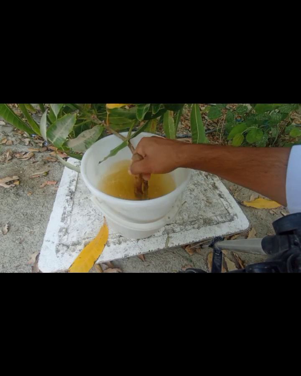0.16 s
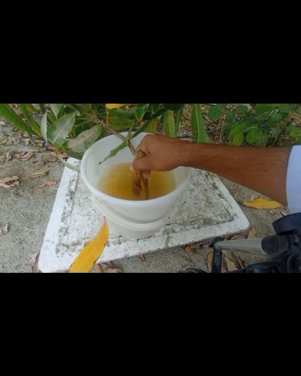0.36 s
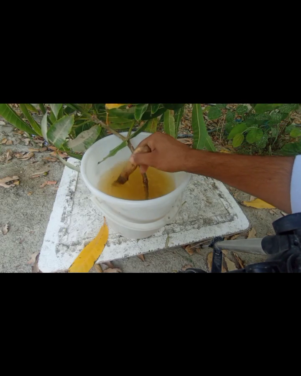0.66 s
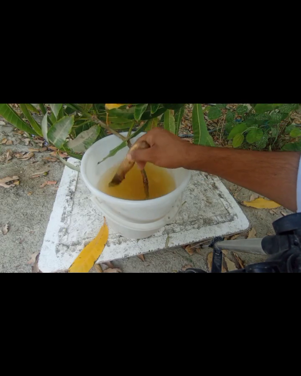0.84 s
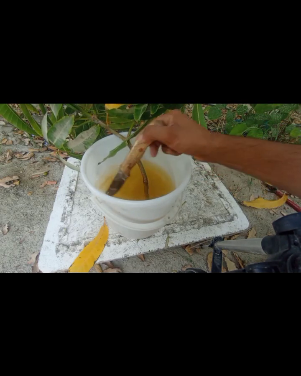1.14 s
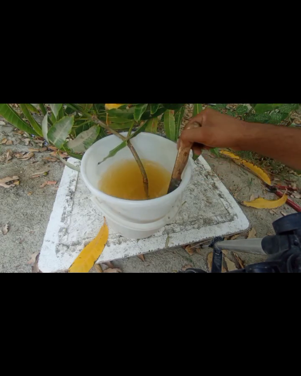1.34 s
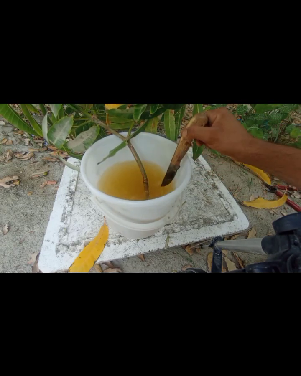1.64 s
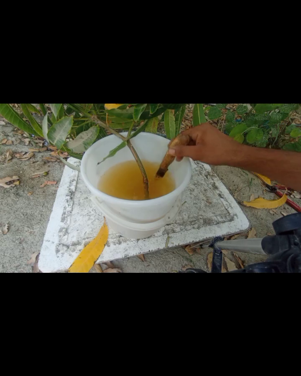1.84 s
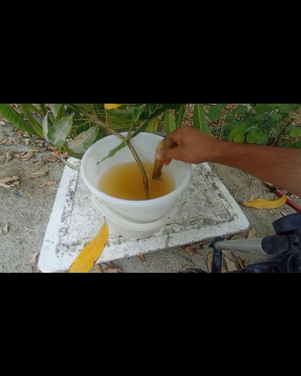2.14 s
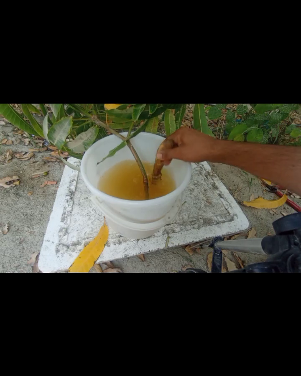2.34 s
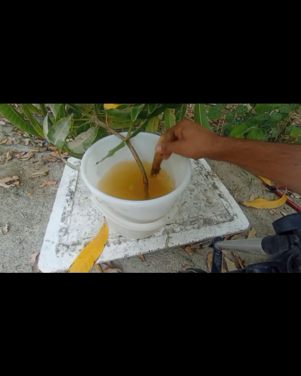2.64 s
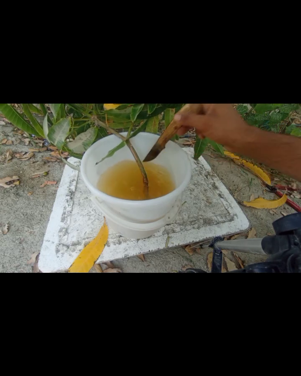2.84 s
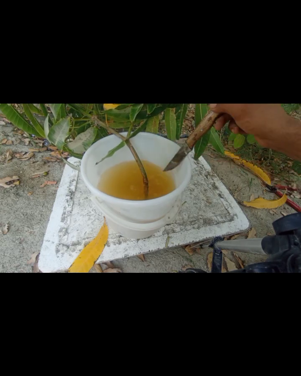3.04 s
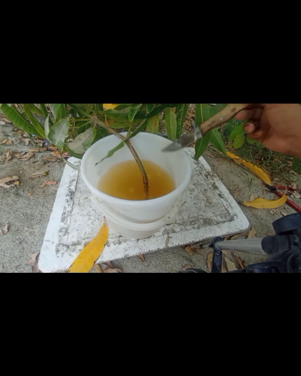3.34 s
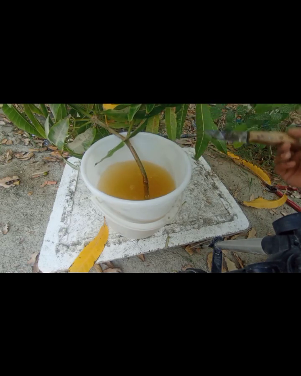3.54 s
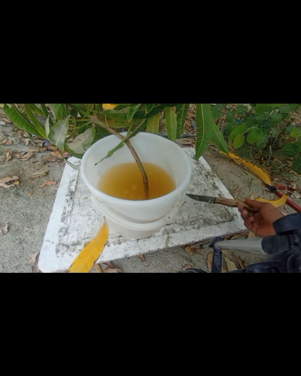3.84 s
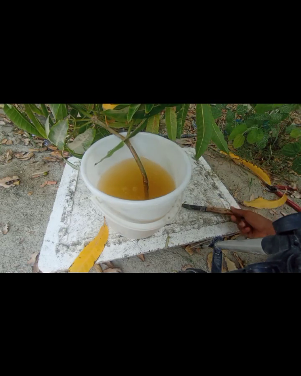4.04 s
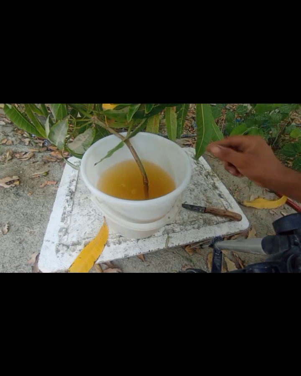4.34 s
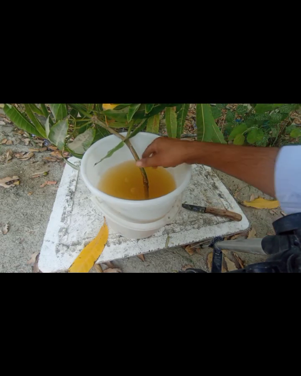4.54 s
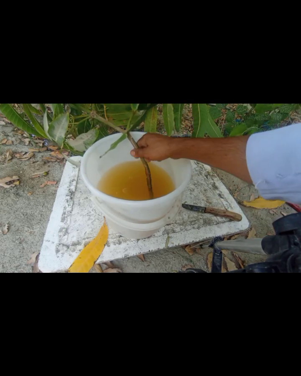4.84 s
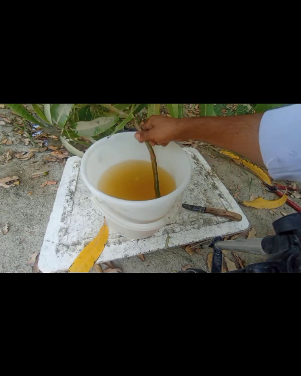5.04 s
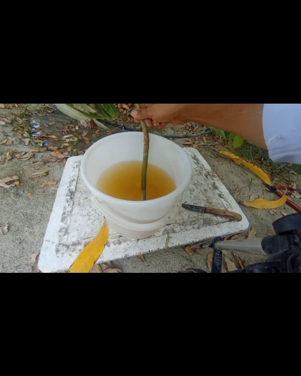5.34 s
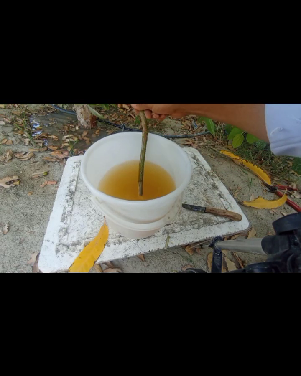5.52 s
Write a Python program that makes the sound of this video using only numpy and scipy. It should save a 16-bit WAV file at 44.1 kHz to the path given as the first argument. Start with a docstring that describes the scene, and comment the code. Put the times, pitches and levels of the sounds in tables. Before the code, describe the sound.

Outdoors, close to the microphone, a knife stirs water in a plastic bucket, knocking the wall with hollow clacks amid small splashes and bubbles. Two bright taps hit the rim, then the knife is laid on a board with dull thumps and a short gritty hiss. A leafy branch rustles faintly as it is lifted and drips, over distant rumble and soft hiss.

```python
"""Knife and bucket outdoors

A knife close by stirs water in a plastic bucket: struck modes and noise make it knock the wall, noise bursts
and rising tones make splashes and bubbles; it taps the rim twice, then is laid on the board under the bucket
with a short slide of hissing grit. A leafy branch rustles in random crackles as it is lifted, its wet stem
dripping. Filtered noise makes a distant rumble and a soft hiss; a wavering sine makes the low hum."""
import sys
import numpy as np
from scipy import signal
from scipy.fft import rfft, irfft
from scipy.io import wavfile
from scipy.ndimage import uniform_filter1d

SR = 44100
rng = np.random.default_rng(int(sys.argv[2]) if len(sys.argv) > 2 else 0)


def store_wav(level_fs):
    """Save 16-bit WAV to argv[1]."""
    pcm = np.round(np.clip(np.atleast_2d(level_fs), -1, 1) * 32767)
    wavfile.write(sys.argv[1], SR, pcm.T.astype(np.int16))


N = 250488
TIME = np.arange(N) / SR  # seconds into the scene
AGE = np.arange(11000) / SR  # seconds since a hit began


def undb(db):
    """Decibels to gain."""
    return 10 ** (np.asarray(db) / 20)


def level(x, db):
    """Scale to this rms level."""
    return x * undb(db) / np.sqrt(np.mean(x ** 2))


def loudest(x, db, span):
    """Scale a hit so that its loudest span seconds have this rms level."""
    power = np.mean(x ** 2, axis=0)
    window = max(int(span * SR), 2)
    return x * undb(db) / np.sqrt(uniform_filter1d(power, window, mode="constant").max())


def pan(db):
    """Left and right gains, db apart; positive leans left."""
    return undb(np.array([[db], [-db]]) / 2)


def fade(t60):
    """Decay by 60 dB in t60 seconds, 2 ms at the shortest."""
    return np.exp(-np.log(1000) * AGE / max(t60, .002))


def swell(rise):
    """Soft onset with this time constant in seconds."""
    return 1 - np.exp(-AGE / max(rise, 1e-5))


def curve(rows):
    """Gain along (s, dB) rows, silent outside them."""
    return undb(np.interp(TIME, *np.transpose(rows), left=-np.inf, right=-np.inf))


def over_hz(rows, n):
    """(Hz, value) rows spread over the bins of an n-sample spectrum."""
    hz, value = np.transpose(rows)
    return np.interp(np.log(np.fft.rfftfreq(n, 1 / SR) + 1), np.log(hz), value)


def colour(x, rows):
    """Filter by (Hz, dB) rows."""
    n = x.shape[-1]
    return irfft(rfft(x) * undb(over_hz(rows, n)), n)


def band(x, lo_hz, hi_hz, order=3):
    """Causal band-pass."""
    sos = signal.butter(order, [lo_hz, min(hi_hz, .48 * SR)], "band", fs=SR, output="sos")
    return signal.sosfilt(sos, x)


# How alike the two channels are. Each row: frequency in Hz, left-right correlation.
LIKENESS = [(60, 0.46), (130, 0.95), (300, 0.66), (700, 0.19), (1400, 0), (16000, 0)]


def noise(n):
    """White stereo noise whose bass is alike left and right."""
    mid, side = rfft(rng.standard_normal((2, n)))
    alike = np.clip(over_hz(LIKENESS, n), -1, 1)
    shared = mid * np.sqrt((1 + alike) / 2)
    opposed = side * np.sqrt((1 - alike) / 2) * np.array([[1], [-1]])
    return irfft(shared + opposed, n)


def walk(rate):
    """Slow chance with a spread near 1, drawn anew rate times a second."""
    k = int(SR / rate)
    steps = np.repeat(rng.standard_normal(N // k + 1), k)
    return 1.3 * uniform_filter1d(uniform_filter1d(steps, k), k)[:N]


def ring(hz, t60, rise=0):
    """A fading resonance; the higher it is, the more its phase differs between the ears."""
    apart = min(hz / 1600, 2) * rng.normal(1.0, 1.0) * np.array([[1], [-1]]) / 2
    cycles = hz * (AGE + rise * AGE ** 2 / 2)
    return np.sin(2 * np.pi * cycles + apart) * fade(t60)


def struck(modes, scatter_db):
    """Every blow lands elsewhere and weights the modes anew, with slightly shifted pitches."""
    out = 0
    for hz, db, t60 in modes:
        weight = rng.choice([-1, 1]) * undb(db + scatter_db * rng.standard_normal())
        out = out + weight * ring(hz * rng.normal(1, 0.022), t60)
    return out


def grains(rate, spread_db):
    """Sparse clicks of very unequal size, rate per second, heard unequally by the two ears."""
    size = undb(spread_db * np.minimum(rng.exponential(size=N), 4))
    return (rng.random(N) < rate / SR) * size * rng.standard_normal((2, N))


def droplets(lo_hz, hi_hz, cycles, spread_db, count):
    """Tiny resonators set off at random, each ringing briefly; rms 1."""
    out = np.zeros((2, N))
    for when, pitch, size, left, right in rng.random((count, 5)):
        hz = lo_hz * (hi_hz / lo_hz) ** pitch
        turn = np.arange(int(cycles / hz * SR) + 2) * hz / SR  # cycles completed
        tone = np.sin(2 * np.pi * (turn + np.array([[left], [right]]) / 2))
        ping = tone * np.exp(-np.log(1000) * turn / cycles) * np.minimum(turn, 1)
        add(out, when * N / SR, undb(spread_db * size ** 2) * ping)
    return level(out, 0)


def add(out, s, x):
    """Mix x into out from time s on."""
    n = out.shape[1]
    i = int(np.clip(s * SR, 0, n - 1))
    out[:, i:i + x.shape[1]] += x[:, :n - i]


# Knife against the bucket, close by. Each row: start in seconds, nominal clack level in dB,
# clack centre in Hz, brightness in dB, thud pitch in Hz, nominal thud level in dB.
KNOCKS = [(0.1748, -56, 2200, 9.5, 374, -35.5), (0.476, -29.5, 2850, -4.5, 402, -21),
          (0.7686, -47.5, 2810, 6.5, 346, -34), (1.3162, -21, 3370, -1.5, 370, -23.5),
          (1.3698, -24.5, 3060, -0.5, 273, -30), (1.4186, -47.5, 2400, -2, 360, -41),
          (1.494, -40, 2220, -0.5, 524, -31), (1.719, -53, 2300, -2, 245, -47.5),
          (1.7615, -42.5, 2320, -3, 567, -46.5), (2.213, -36, 3130, 4.5, 373, -45.5),
          (2.5539, -30, 2240, -1, 449, -41.5), (2.66, -45.5, 2570, -34, 510, -50),
          (3.049, -21, 1970, 5, 242, -28.5), (3.2269, -22.5, 1720, 6.5, 216, -33.5)]
# Modes of the bucket of water. Each row: frequency in Hz, mean level in dB, t60 in seconds.
BUCKET = [(146, -5.5, 0.25), (261, -10, 0.28), (379.1, -2, 0.19), (431.8, -3, 0.16), (542.6, -0.5, 0.13),
          (626, 2.5, 0.026), (939, -2, 0.024), (1057, 2, 0.042), (1072, -4.5, 0.081), (1630, -2, 0.06),
          (1838, 3, 0.023), (2005, -4, 0.055), (2374, -21.5, 0.11), (2650, -7, 0.05), (3260, -17.5, 0.11),
          (3355, -20, 0.05), (3860, -26.5, 0.12), (5900, -2, 0.0094), (6470, 4.5, 0.018)]
WALL_DB, TICK_DB = -2.5, -9  # wall ring and blade tick at zero brightness, relative to the nominal clack
WALL_LOSS = 0.32  # dB of wall ring lost per dB of brightness
KNOCK_PAN_DB = 2  # left minus right
CLACK_OCTAVES, CLACK_RISE_S = 1.38, 0.00056  # width of the clack; time it takes to spread through the wall


def knocks():
    """The blade ticks, the plastic clacks, the wall rings and the water-loaded bucket thuds a little later."""
    out, half_width = np.zeros((2, N)), 2 ** (CLACK_OCTAVES / 2)
    for s, clack_db, clack_hz, bright_db, thud_hz, thud_db in KNOCKS:
        wall_db = clack_db + WALL_DB - WALL_LOSS * bright_db
        tick_db = clack_db + TICK_DB + bright_db
        modes, dense = struck(BUCKET, scatter_db=3.0), noise(len(AGE))

        body = modes + undb(12.5) * ring(thud_hz, 0.048) + undb(15.5) * dense * fade(0.11)
        # little moves below the note that the blow picks out
        thud = band(body, 0.52 * thud_hz, 823, order=4) * swell(0.0022)

        wall = band(modes + undb(6.5) * dense * fade(0.055), 790, 1337) * swell(0.0042)

        plastic = modes + undb(0.5) * dense * (fade(0.068) + 2 * fade(0.035))
        clack = band(plastic, clack_hz / half_width, clack_hz * half_width) * swell(CLACK_RISE_S)

        blade = modes + undb(13.5) * dense * (fade(0.01) + undb(-13.5) * fade(0.082))
        tick = band(blade, 5270, 12500, order=2)

        hit = loudest(wall, wall_db, 0.0024)
        hit = hit + loudest(clack, clack_db - 6, 0.008)
        hit = hit + loudest(tick, tick_db, 0.0031)
        add(out, s, hit * pan(KNOCK_PAN_DB))
        add(out, s + 0.001934, loudest(thud, thud_db - 0.5, 0.0083) * pan(KNOCK_PAN_DB / 2))
    return out


# The clearest splashes. Each row: start in seconds, slap level in dB, spray level in dB, t60 in seconds.
SPLASHES = [(0.063, -50.5, -47.5, 0.1), (0.522, -39.5, -35.5, 0.042), (0.527, -42.5, -34, 0.024),
            (0.957, -34.5, -28, 0.06), (1.09, -56, -42.5, 0.034), (1.255, -55, -49, 0.08),
            (1.511, -59, -44, 0.06), (2.036, -49, -52.5, 0.059), (2.099, -44.5, -47, 0.068),
            (2.135, -45.5, -44, 0.093), (2.258, -46.5, -46.5, 0.037), (2.347, -33.5, -37, 0.028),
            (2.397, -41, -45, 0.093), (2.442, -33.5, -32.5, 0.023), (2.494, -54, -50, 0.018),
            (2.595, -37.5, -46, 0.072), (2.693, -47, -41, 0.17), (2.739, -39.5, -44.5, 0.015),
            (2.781, -58, -43, 0.056), (2.898, -42, -40.5, 0.02)]
DROPLET_HZ, DROPLET_TOP_HZ = 5190, 10800  # starting pitch when spray equals slap; smallest droplet
DROPLET_OCTAVES_PER_DB = 0.15  # finer spray, higher droplet


def splashes(count=9):
    """Water slaps shut, throws a spray and traps a cluster of tiny bubbles; one droplet rings out."""
    out, bucket = np.zeros((2, N)), struck(BUCKET, scatter_db=2)
    for s, slap_db, spray_db, t60 in list(SPLASHES) + strays(count=24):
        hz = min(DROPLET_HZ * 2 ** (DROPLET_OCTAVES_PER_DB * (spray_db - slap_db)), DROPLET_TOP_HZ)
        burst = noise(len(AGE)) * (undb(5.5) * fade(t60) + undb(13.0) * fade(0.0033))
        burst = burst + undb(3) * ring(hz, .5 * t60, rise=1.9)
        for when, pitch, size in rng.random((count, 3)):
            bubble_hz = 1400 * 9 ** pitch
            bubble = ring(bubble_hz, 1.74 / np.sqrt(bubble_hz), rise=4.4)
            add(burst, .4 * t60 * when, undb(-0.5 - 5.8 * size - 10 * when) * bubble)
        slap = band(burst + undb(-26.0) * bucket, 2100, 5340, order=2)
        slap = loudest(slap, slap_db, 0.00081)
        spray = loudest(band(burst, 6950, 13000), spray_db, 0.0013)
        add(out, s, slap * pan(2.2) + spray * pan(4.1))
    return out


STRAY_SLAP_DB, STRAY_SPRAY_DB, STRAY_SCATTER_DB = 9.5, 16.5, 4  # mean relative to the stirring; spread
STRAY_T60_S = 0.03


def strays(count):
    """Lesser splashes that follow the stirring, as (s, slap dB, spray dB, t60 s)."""
    times, stir_db = stirred(count)
    slap_db, spray_db = stir_db + STRAY_SCATTER_DB * rng.standard_normal((count, 2)).T
    t60 = np.full(count, STRAY_T60_S)
    return list(zip(times, slap_db + STRAY_SLAP_DB, spray_db + STRAY_SPRAY_DB, t60))


# The largest trapped bubbles and drips, and a faint ring of the bucket wall near 1 kHz at 2.257 s. Each row:
# start in seconds, # nominal level in dB, starting pitch in Hz, rise in shares of that pitch per second.
RISING_TONES = [(1.091, -50, 1185, 16), (1.503, -39.5, 530.0, 4.1), (2.151, -44.5, 533, 2),
                (2.257, -50, 1033, 1.7), (2.324, -51.5, 540, 1.5), (2.451, -50.5, 1630.0, 3),
                (2.527, -49, 2310, 26), (2.6, -44, 2730, 1.9), (2.72, -49, 1980, 2.9), (5.134, -56, 1720, 1.8),
                (5.173, -58.5, 1050, 2.6)]
DRIP_START_S, DRIP_SPAN_S, DRIP_DB = 4.8, 0.48, -58.5  # the lifted stem drips into the bucket; nominal top level


def bubbles():
    """Each bubble rings, the longer the larger it is, and climbs in pitch as it nears the surface; the wall
    ring in the table is played the same way."""
    out = np.zeros((2, N))
    times, stir_db = stirred(count=70)
    shed = small_bubbles(times, stir_db + SMALL_BUBBLE_DB)
    drips = small_bubbles(DRIP_START_S + DRIP_SPAN_S * rng.random(size=9), DRIP_DB)
    for s, db, hz, rise in list(RISING_TONES) + shed + drips:
        bubble = ring(hz, 2 / np.sqrt(hz), rise) * swell(0.00049)
        add(out, s, undb(db + 6.0) * bubble * pan(5.5))
    return out


# lowest starting pitch, range above it, fastest climb in shares of the pitch per second
SMALL_BUBBLE_HZ, SMALL_BUBBLE_OCTAVES, SMALL_BUBBLE_RISE_PER_S = 804, 2.2, 6.1
SMALL_BUBBLE_DB, SMALL_BUBBLE_SPREAD_DB = 11, 15.5  # nominal top above the stirring; range below that


def small_bubbles(times, top_db):
    """Bubbles of random size at these times, as (s, nominal dB, pitch Hz, rise per s)."""
    size, pitch, climb = rng.random((len(times), 3)).T
    hz = SMALL_BUBBLE_HZ * 2 ** (SMALL_BUBBLE_OCTAVES * pitch)
    db = top_db - SMALL_BUBBLE_SPREAD_DB * size
    return list(zip(times, db, hz, SMALL_BUBBLE_RISE_PER_S * climb ** 2))


# Strength of the stirring. Each row: time in seconds, level in dB.
STIR = [(0.0, -67.5), (0.26, -71), (1.09, -73.5), (1.46, -66), (1.55, -68.5), (1.82, -73.5), (2.08, -72),
        (2.3, -61.5), (2.55, -61.5), (2.7, -68.5), (2.84, -71), (3.1, -72.5)]
GURGLE_DB, FIZZ_DB, SWISH_DB, RUB_DB = -4.5, -7, -6, -6.5  # relative to the stirring


def swirl():
    """Stirring sheds blurred little bubbles, a fine fizz and a swish, and rubs the bucket wall into a faint ring."""
    gurgle = undb(GURGLE_DB) * droplets(600, 4070, cycles=22, spread_db=16, count=2800)
    fizz = undb(FIZZ_DB) * droplets(4500, 14000, cycles=28, spread_db=14, count=3000)
    swish = band(noise(N), 400, 2400, order=2) * undb(4.5 * walk(60))
    rub = band(grains(200, spread_db=14.5), 780, 1310, order=1)
    water = gurgle + fizz * pan(0.76) + level(swish, SWISH_DB)
    return (water + level(rub, RUB_DB)) * curve(STIR)


def stirred(count):
    """Random moments, as frequent as the stirring is powerful: their times and the stirring dB at each."""
    effort = np.cumsum(curve(STIR) ** 2)
    share = (np.arange(count) + rng.random(count)) / count
    times = np.interp(share, effort / effort[-1], TIME)
    return times, np.interp(times, *np.transpose(STIR))


# Knife and hand landing on the board. Each row: start in seconds, nominal level in dB, thud pitch in Hz.
THUMPS = [(3.979, -22, 184), (4.032, -34, 179), (4.125, -30.5, 399), (4.195, -23, 343.6), (4.232, -37, 162)]
# Modes of the board. Each row: frequency in Hz, mean level in dB, t60 in seconds.
BOARD = [(125.2, -11, 0.3), (185, -7, 0.12), (245, -14, 0.18), (333.5, -12, 0.089), (408, -5.5, 0.066),
         (479, -0.5, 0.056), (639, -7.5, 0.038), (1107, -6.5, 0.018)]
# Colour of the crack. Each row: frequency in Hz, gain in dB.
BOARD_CRACK = [(40, -33), (130, -1), (500, 8.5), (1000, -7.5), (2000, -15), (4500, -28), (10000, -16),
               (16000, -33)]


def thumps():
    """The handle drops on the board: a faint crack, then the slow, low modes swell."""
    out = np.zeros((2, N))
    for s, peak_db, hz in THUMPS:
        body = (struck(BOARD, scatter_db=6.0) + ring(hz, 0.089)) * swell(0.0012)
        crack_fade = fade(0.05) + undb(-18) * fade(0.5)
        crack = colour(noise(len(AGE)), BOARD_CRACK) * crack_fade * swell(0.0008)
        add(out, s, loudest(crack, peak_db - 13.5, 0.006))
        add(out, s + 0.0017, loudest(body, peak_db - 4.5, 0.0064))
    return out


# Blade sliding on the board. Each row: time in seconds, level in dB.
SLIDE = [(4.036, -74), (4.046, -43), (4.092, -39.5), (4.14, -53), (4.166, -51), (4.186, -82)]
# Colour of the slide. Each row: frequency in Hz, gain in dB.
SLIDE_COLOUR = [(1180, -53), (2000, -25), (2400, -28), (2620, -32), (3090, -20), (4080, -14), (4450, -9.5),
                (5880, -14.5), (11400, -2.5), (16000, -23)]


def slide():
    """The steel edge hisses over the gritty board."""
    grit = level(noise(N), 0) + level(grains(4000, spread_db=5), -4)
    return level(colour(grit, SLIDE_COLOUR), 0) * curve(SLIDE) * pan(0.31)


# Colour of the rustle. Each row: frequency in Hz, gain in dB.
LEAF_COLOUR = [(250, -11), (450, 2), (800, -12), (1700, -4), (3000, -4), (6000, -3.5), (10000, 0),
               (16000, -14)]
# Leaves and twigs flicking. Each row: start in seconds, nominal level in dB.
FLICKS = [(3.784, -52), (4.4575, -49.5), (4.9402, -49.5), (5.3991, -51)]
FLICK_HZ = 10650  # mean pitch
# the branch is lifted: its rustle swells, holds and dies away; LIFT_DB is nominal
LIFT_S, LIFT_ATTACK_S, LIFT_HOLD_S, LIFT_FALL_DB_PER_S, LIFT_DB = 4.75, 0.04, 0.28, 36, -60


def leaves():
    """Leaves brush each other in uneven flurries of tiny crackles, and a few flick free."""
    crackle = droplets(400, 3900, cycles=20, spread_db=9, count=2400)
    rustle = level(colour(grains(2500, spread_db=3.0), LEAF_COLOUR), 0) * undb(2 * walk(35))
    settling = np.maximum(TIME - LIFT_S - LIFT_ATTACK_S - LIFT_HOLD_S, 0)
    attack = np.clip((TIME - LIFT_S) / LIFT_ATTACK_S, 0, 1)
    lift = attack * undb(LIFT_DB - LIFT_FALL_DB_PER_S * settling)
    out = undb(-4.5) * (rustle + crackle) * lift
    for s, peak_db in FLICKS:
        flick = band(noise(len(AGE)), 2700, 22000, order=1) * fade(0.024)
        flick = flick + undb(10.5) * ring(FLICK_HZ * rng.normal(1, .1), 0.018)
        add(out, s, loudest(flick, peak_db - 1, 0.0023))
    return out


# Treble hiss, of which only the departures from its mean are used. Each row: time in seconds, level in dB.
HISS = [(0.0, -66), (1.99, -68.5), (2.45, -64), (2.59, -65), (2.88, -68), (5.28, -69), (5.68, -65.5)]
RUMBLE_WAVER_DB, RUMBLE_WAVERS_PER_S = 1.1, 2.31


def background():
    """A far rumble that wavers, a low hum, and a hiss whose bands flutter on their own."""
    hiss_db = np.interp(TIME, *np.transpose(HISS))
    hiss_db = hiss_db - hiss_db.mean()
    rumble_db = RUMBLE_WAVER_DB * walk(RUMBLE_WAVERS_PER_S)
    return rumble_and_hiss(hiss_db, rumble_db) + prickle(hiss_db) + hum(rumble_db)


# Colour of the outdoor air. Each row: frequency in Hz, relative level in dB per Hz.
AIR = [(15, -75), (25, -43), (64, -11.5), (84, -8), (130, -3.5), (344, -11.5), (516, -19.5), (591, -24.5),
       (695, -29.5), (1560, -31.5), (1700, -29.5), (1940, -32.5), (3920, -36), (10100, -29), (16000, -40)]
AIR_DB = -55  # rms before the bands flutter
# Lean of the air between the channels. Each row: frequency in Hz, left minus right in dB.
AIR_PAN = [(100, -.5), (2400, 0.5), (4400, -0.5), (8100, 0.5), (15000, 8.5)]


def rumble_and_hiss(hiss_db, rumble_db):
    """Coloured noise cut into bands whose levels wander separately; the lowest band is the rumble."""
    air = colour(noise(N), AIR)
    left = [(hz, db / 2) for hz, db in AIR_PAN]
    right = [(hz, -db / 2) for hz, db in AIR_PAN]
    air = level(np.array([colour(air[0], left), colour(air[1], right)]), AIR_DB)
    spectrum, bins = rfft(air), np.fft.rfftfreq(N, 1 / SR)
    edges = np.r_[0, 300, 700, np.arange(1400, 17000, 900)]  # Hz
    out = 0
    for lo, hi in zip(edges, edges[1:]):
        # the hiss curve takes full hold from 6 kHz up
        db = 2.2 * walk(45) + hiss_db * min(lo / 6000, 1) + rumble_db * (lo == 0)
        inside = (bins >= lo) & (bins < hi)
        out = out + irfft(spectrum * inside, N) * undb(db)
    return out


def prickle(hiss_db):
    """Faint high pings of very unequal size, rising and falling with the hiss."""
    return droplets(7400, 15000, cycles=90, spread_db=33, count=1200) * undb(hiss_db - 79) * pan(3.3)


def hum(rumble_db):
    """A tone near 97 Hz that drifts in pitch and level, and wavers with the rumble."""
    hz = 97 * (1 + 0.013 * walk(5.3))
    tone = np.sin(2 * np.pi * np.cumsum(hz) / SR)
    return level(tone * undb(1.03 * walk(2.86) + rumble_db), -61.5)


def scene():
    """Knife, water, board and leaves close by in the open air, over the background."""
    bucket = knocks() + splashes() + bubbles() + swirl()
    return bucket + thumps() + slide() + leaves() + background()


TOP_HZ = 16100


def record(dry):
    """The recorder cuts the treble steeply above TOP_HZ."""
    return signal.sosfilt(signal.ellip(10, .2, 70, TOP_HZ, fs=SR, output="sos"), dry)


dry = scene()
out = record(dry)
store_wav(out)
```